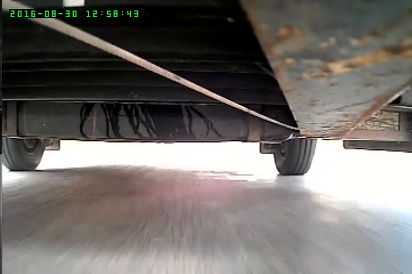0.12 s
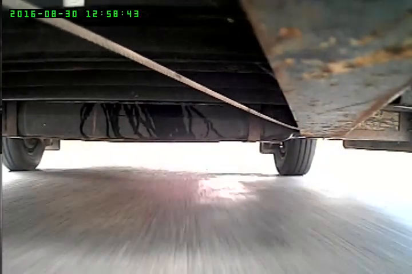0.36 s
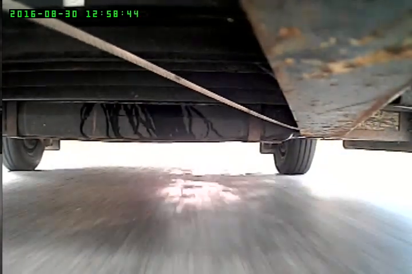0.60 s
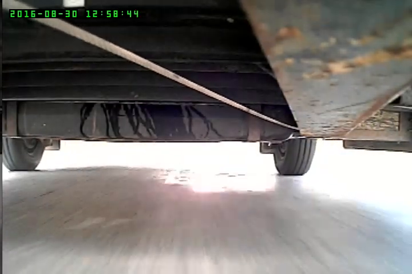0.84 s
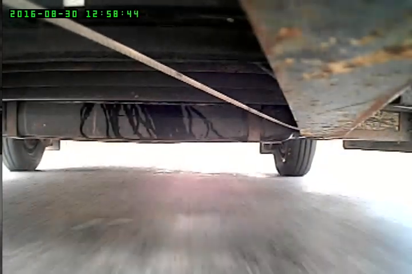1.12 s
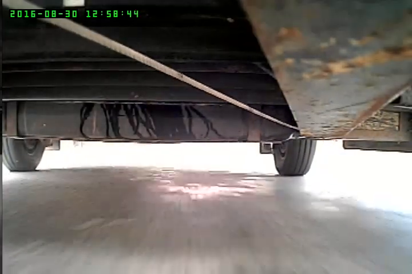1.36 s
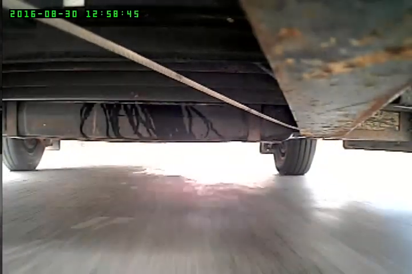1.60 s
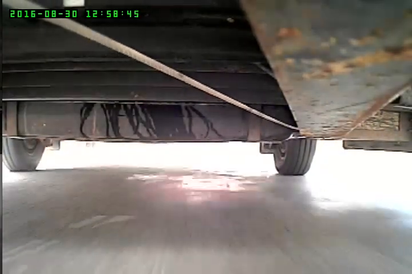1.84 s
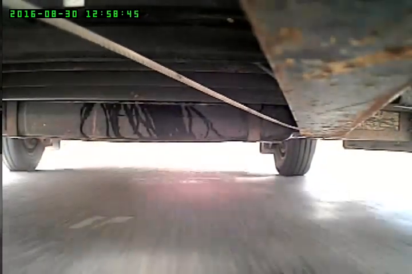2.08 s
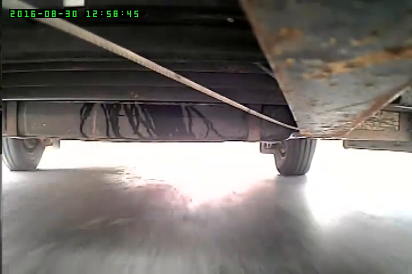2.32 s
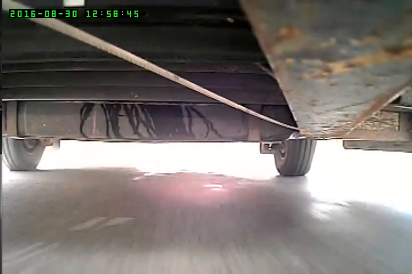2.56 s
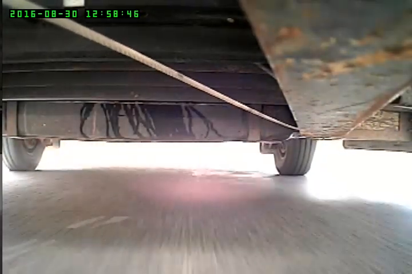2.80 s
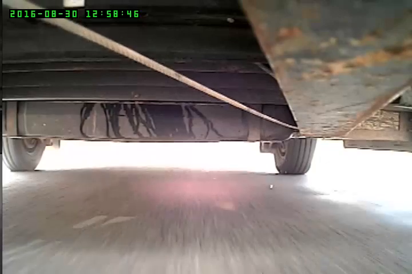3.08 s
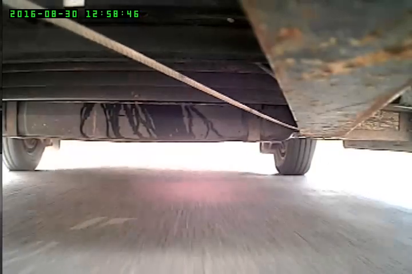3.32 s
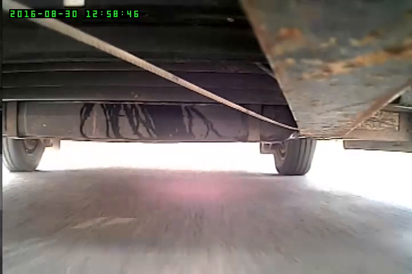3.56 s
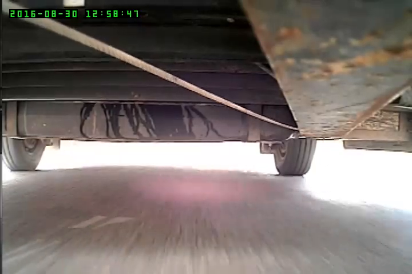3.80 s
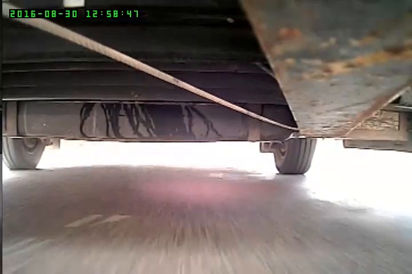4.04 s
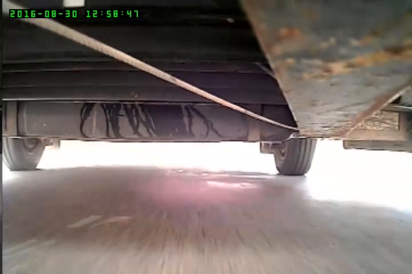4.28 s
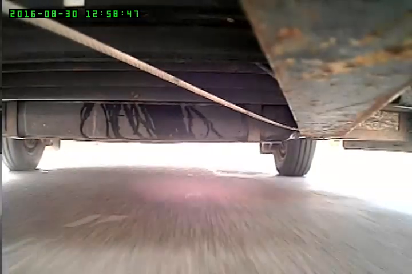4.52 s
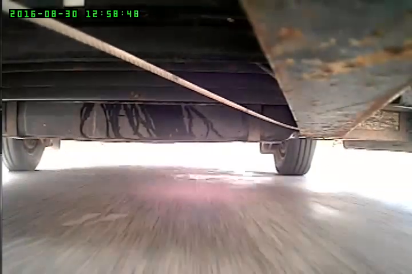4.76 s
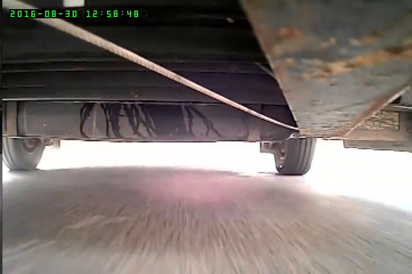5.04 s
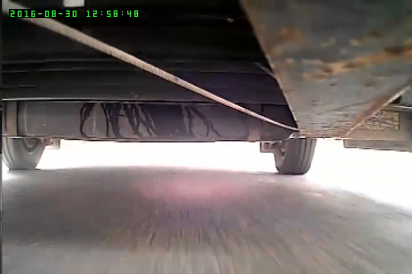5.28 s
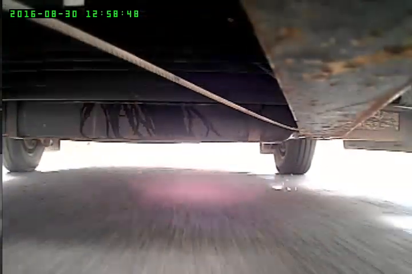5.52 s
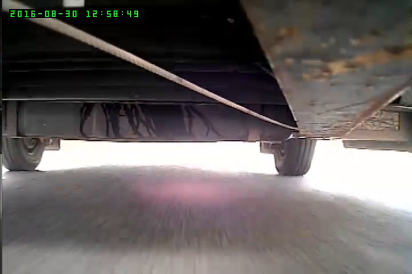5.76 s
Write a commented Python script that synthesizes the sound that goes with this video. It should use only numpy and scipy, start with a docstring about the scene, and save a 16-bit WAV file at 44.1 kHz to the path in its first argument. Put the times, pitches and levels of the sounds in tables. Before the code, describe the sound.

A microphone fixed beneath a caravan towed at speed takes in nearly six seconds of unbroken road noise. Deep, irregular bass buffeting dominates, fluttering and thudding several times a second, with its strongest surges clipping into rough distortion. Over it runs a steady low tyre drone and grainy roar from coarse tarmac, with a thin fizz of air from the tread. A faint high squeak slides down at the very start; grit puffs at 0 and 0.5 s, with two close stone ticks near 0.45 s and a slight hiss swelling around 0.7 s. The tow car's low engine hum rises to about 1.8 s, sinks by 2.7 s, and later wavers, its pitch creeping up very slightly. Soft tread scrubs come near 4, 4.7 and 5.1 s, the roar lifts briefly around 4.6 and 5.5 s, and faint stone ticks fall near 3.5, 4.7 and 5.85 s. It ends still rolling.

```python
"""Under a caravan towed at speed over a coarse sealed road, heard through one overloading microphone.
Shaped noise and tone bursts make the deep bass throb of air and chassis; noise bands make the tyre roar.
The tow car's eight-cylinder engine is a sum of crankshaft multiples that slowly gains speed.
Grit hisses in bands of noise, a squeal slides down, and stones ring the floor pan as damped tones."""
import sys
import numpy as np
from scipy import signal
from scipy.fft import rfft, irfft, next_fast_len
from scipy.io import wavfile
from scipy.ndimage import uniform_filter1d, map_coordinates

SR = 44100
rng = np.random.default_rng(int(sys.argv[2]) if len(sys.argv) > 2 else 0)


def generate_wav(sig):
    """Save sig (samples, or channels by samples) to the path in sys.argv[1] as 16-bit PCM at SR."""
    pcm = np.round(np.clip(np.atleast_2d(sig).T, -1, 1) * 32767).astype(np.int16)
    wavfile.write(sys.argv[1], SR, pcm)


def invert_db(x):
    """Field ratio 10**(x/20) for x, a level in decibels (scalar or array-like)."""
    u = np.asarray(x, float) / 20
    return 10 ** u


N = 259274  # samples
TIME = np.arange(N) / SR  # s


def unit(x):
    """Normalisation: scales a signal to an rms of 1."""
    return x / np.sqrt(np.mean(x ** 2) + 1e-20)


def curve(rows):
    """Linear interpolation: joins (t/s, level/dB) points into one level per sample."""
    s, db = np.transpose(rows)
    return np.interp(TIME, s, db)


def wobble(rate):
    """Band-limited fluctuation: a spline through random knots, rate of them a second."""
    knots = rng.standard_normal(int(N * rate / SR) + 4)
    return map_coordinates(knots, [np.arange(N) * rate / SR])


def coloured(x, spectrum):
    """Linear filtering: x through (f/Hz, level/dB) points joined on a log axis, -120 dB outside."""
    m = next_fast_len(N + 8192)
    hz, db = np.transpose(spectrum)
    log_f = np.log(np.fft.rfftfreq(m, 1 / SR) + 1)
    shape = np.interp(log_f, np.log(hz + 1), db, -120, -120)
    return irfft(rfft(x, m) * invert_db(shape), m)[:N]


def rush(spectrum, grain_db, even_s):
    """Modulated noise: grainy from chipping to chipping, level held even over even_s, rms 1."""
    grainy = rng.standard_normal(N) * invert_db(grain_db * wobble(300))
    x = coloured(grainy, spectrum)
    span = int(even_s * SR)
    power = uniform_filter1d(uniform_filter1d(x ** 2, span), span)
    return unit(x / np.sqrt(np.abs(power) + 1e-12))


def swell(s, half_s):
    """Gaussian envelope: a smooth hump of height 1 around s, down to 1/e at half_s."""
    return np.exp(-((TIME - s) / half_s) ** 2)


def burst(s, db, hz, half_s, phase):
    """Wave packet: a tone under a Gaussian envelope, phase in cycles."""
    return invert_db(db) * swell(s, half_s) * np.sin(2 * np.pi * (hz * TIME + phase))


# spectrum of the air pumping under the floor: f/Hz, relative level/dB per Hz
SWAY_SPECTRUM = [(2, -25), (5, -3.5), (12, -1), (16, 4.5), (19, -16), (26, -11), (30, -36)]


def sway():
    """Unsteady pressure: air pumps under the floor as deep, fluctuating noise."""
    return invert_db(-18 + 2.7 * wobble(4.037)) * rush(SWAY_SPECTRUM, grain_db=-1.5, even_s=0.27)


# spectrum of the chassis on its springs: f/Hz, relative level/dB per Hz
BOUNCE_SPECTRUM = [(22, -43.5), (27, -9), (32, -3.5), (35, -5), (39, -5), (44, -5.5), (50, -42)]


def bounce():
    """Mass on a spring: the bouncing chassis favours a narrow band of noise."""
    return invert_db(-21 + 1.1 * wobble(14)) * rush(BOUNCE_SPECTRUM, grain_db=2.5, even_s=0.16)


# spectrum of the throbbing floor pan: f/Hz, relative level/dB per Hz
THROB_SPECTRUM = [(40, -47), (46, 0.5), (55, 1), (62, -7), (69, -17), (80, -20.5), (95, -47)]


def throb():
    """Panel resonance: the floor pan throbs in a narrow bass band."""
    return invert_db(-21 + 1.95 * wobble(13)) * rush(THROB_SPECTRUM, grain_db=-1.0, even_s=0.12)


# coarseness of the surface, as tread roar: t/s, level/dB
ROAD_LEVEL = [(0, -31.5), (.7, -32), (1.1, -31.5), (1.8, -32), (2.6, -31.5), (3.3, -31.5), (4, -30.5),
              (4.5, -31), (4.95, -31), (5.4, -31), (5.88, -31)]
# patches of road that change the roar, mostly lifting it: t/s, level change/dB, half length/s
ROAD_PATCHES = [(1.073, 1, 0.073), (2.815, -0.5, 0.023), (4.577, 2, .03), (4.883, 1, 0.04),
                (5.106, 1, 0.055), (5.494, 1.5, 0.026)]


def road():
    """Roughness excitation: the surface sets the tread level/dB and its brief changes/dB."""
    patch_db = sum(db * swell(s, half_s) for s, db, half_s in ROAD_PATCHES)
    return curve(ROAD_LEVEL), patch_db


# spectrum of the tyre carcass: f/Hz, relative level/dB per Hz
DRONE_SPECTRUM = [(55, -22.5), (66, -2), (100, -1), (135, -1), (155, 0), (177, -7), (189, 0), (199, -5.5),
                  (210, -4), (228, -4.5), (280, -12), (320, -6.5), (420, -13.5), (520, -31), (650, -53)]


def drone(road_db):
    """Carcass vibration: low noise follows the road's swings, above the tread roar."""
    level_db = road_db + 7.5 + 0.78 * wobble(15)
    return invert_db(level_db) * rush(DRONE_SPECTRUM, grain_db=0.45, even_s=0.084)


# spectrum of the tread on the chippings: f/Hz, relative level/dB per Hz
ROAR_SPECTRUM = [(330, -33.5), (420, 1), (500, 1.5), (620, -3), (750, -1), (860, -5.5), (940, -4.5),
                 (1100, -8), (1400, -12.5), (1700, -27.5), (2100, -46.5)]


def roar(road_db, patch_db):
    """Impact noise: tread on chippings gives a broad band at the road's level."""
    level_db = road_db + patch_db + .4 * wobble(13)
    return invert_db(level_db) * rush(ROAR_SPECTRUM, grain_db=1.24, even_s=1.0)


# spectrum of air leaving the tread grooves: f/Hz, relative level/dB per Hz
FIZZ_SPECTRUM = [(1150, -48.5), (1450, -0.5), (1600, 0.5), (2000, -2), (2450, -2.5), (2950, -7.5),
                 (3250, -11), (3600, -14.5), (4000, -20), (4600, -30.5), (5500, -51.5)]


def fizz(road_db, patch_db):
    """Air pumping: air squeezed from the grooves fizzes, feeling the patches less than the roar."""
    level_db = road_db + 0.68 * patch_db - 14.5 + 0.59 * wobble(21)
    return invert_db(level_db) * rush(FIZZ_SPECTRUM, grain_db=1.0, even_s=0.19)


# spectrum of grit lifted off the road: f/Hz, relative level/dB per Hz
GRIT_SPECTRUM = [(3000, -35), (4000, -9), (5000, -6), (5600, -4), (6100, 1), (6700, -6), (8000, -7),
                 (9500, -8), (10300, -12), (11200, -25), (12000, -29)]
# times when the grit hiss swells: t/s, rise/dB, half length/s
GRIT_RISES = [(0.67, 3.5, 0.055), (0.77, 5.5, 0.085), (0.99, 2, 0.1)]


def grit():
    """Random impacts: many grains blend into a hiss with a few swells."""
    rise_db = sum(db * swell(s, half_s) for s, db, half_s in GRIT_RISES)
    level_db = -57.5 + rise_db + 0.71 * wobble(15)
    return invert_db(level_db) * rush(GRIT_SPECTRUM, grain_db=1.2, even_s=0.18)


# spectrum of a puff of grit: f/Hz, relative level/dB per Hz
PUFF_SPECTRUM = [(1200, -26.5), (1800, 6), (2600, 8.5), (3500, -4), (4600, -2.5), (5400, 0), (6100, 3),
                 (6900, -7), (9000, -9), (10500, -11.5), (12000, -34)]
# puffs of loose grit thrown up: t/s, peak level/dB, half length/s
PUFF_TIMES = [(0, -49, 0.06), (0.48, -47, 0.065), (2.95, -57, 0.056), (3.966, -53.5, .07),
              (4.744, -55, .07), (5.069, -55, 0.062)]


def puffs():
    """Gated noise: loose grit thrown up hisses under short Gaussian envelopes."""
    envelope = sum(invert_db(db) * swell(s, half_s) for s, db, half_s in PUFF_TIMES)
    return envelope * rush(PUFF_SPECTRUM, grain_db=0.0, even_s=.1)


# exhaust tones: multiple of crank speed, level before effort/dB rms
EXHAUST_ORDERS = [(2, -29.5), (3, -41), (4, -26.5), (5, -45), (5.5, -47.5), (6, -48), (8, -40.5),
                  (8.5, -44), (9.5, -44.5), (10.5, -45), (11.5, -56.5), (13.5, -46), (16, -64.5),
                  (17, -52.5), (19, -60.5), (24, -66.5), (28, -64.5)]
# engine effort: t/s, level change/dB
ENGINE_EFFORT = [(0, 1), (.5, 2), (.8, 0), (1.3, 3), (1.8, 4.5), (2.35, 2.5), (2.65, -3), (3.3, 0),
                 (3.8, -3), (4.2, -4), (4.6, -2), (5.1, 0), (5.6, -2.5), (5.88, -4)]


def engine():
    """Harmonic series: four firings a turn; uneven cylinders add the half multiples."""
    waver = 0.33 + 0.14 * np.clip(TIME - 2.3, 0, 2)  # turns/s, growing from 2.3 s to 4.3 s
    turns_per_s = 29.83 + 0.2 * TIME + waver * wobble(11)  # crank speed and its steady gain
    angle = 2 * np.pi * np.cumsum(turns_per_s) / SR
    start = 2 * np.pi * rng.random(len(EXHAUST_ORDERS))
    tones = sum(invert_db(db) * np.sin(order * angle + p) for (order, db), p in zip(EXHAUST_ORDERS, start))
    level_db = curve(ENGINE_EFFORT) + 0.64 * wobble(5.1) + 1.2 * wobble(16)
    return np.sqrt(2) * invert_db(level_db) * tones  # sqrt(2) turns rms into peak


def squeak():
    """Frequency modulation: a short squeal slides down and settles, breathy from random scatter."""
    from_hz, to_hz, fall_s, scatter_hz = 4600, 3700, 0.022, 130
    hz = to_hz + (from_hz - to_hz) * np.exp(-TIME / fall_s) + scatter_hz * wobble(900)
    envelope = invert_db(-52) * swell(0.035, 0.045) * (1 + .5 * wobble(500))
    return envelope * np.sin(2 * np.pi * np.cumsum(hz) / SR)


# strongest surges of the deep bass: t/s, peak level before the floor stiffens/dB, f/Hz
BASS_SURGES = [(0.113, -8.5, 50.6), (0.156, -11.5, 33.7), (0.188, -14, 22.4), (0.218, -8.5, 53.3),
               (0.277, -9.5, 35.6), (0.32, -14, 57), (0.374, -15, 33.7), (0.431, -11, 16.2),
               (0.644, -7, 44), (0.762, -6.5, 36), (0.785, -10.5, 52), (0.932, -8, 37), (1.018, -8.5, 48.1),
               (1.15, -14.5, 62), (1.209, -9.5, 37.3), (1.268, -11, 16.5), (1.435, -10.5, 15.3),
               (1.46, -7.5, 45.7), (1.63, -13.5, 18.8), (1.721, -9.5, 39.2), (1.794, -11, 59),
               (1.864, -8, 41.6), (2.156, -8.5, 34.6), (2.408, -9.5, 34.5), (2.447, -11, 13.5),
               (2.537, -8.5, 37), (2.683, -12, 37.3), (2.925, -11, 15.8), (2.941, -10.5, 47),
               (3.159, -8.5, 47), (3.46, -9, 16.5), (3.463, -9.5, 54), (3.639, -9, 15.2),
               (3.834, -10.5, 20.3), (3.848, -8, 37.3), (3.87, -13, 61), (3.971, -8, 37),
               (4.256, -11, 56.0), (4.32, -6.5, 37.4), (4.401, -9, 37.3), (4.503, -12.5, 32.0),
               (4.571, -11, 19.3), (4.726, -8.5, 35.4), (4.803, -10, 37.3), (4.882, -6.5, 18.1),
               (5.029, -8, 51), (5.134, -7.5, 54), (5.254, -11, 53.3), (5.551, -5, 46.6),
               (5.553, -11, 17.8), (5.617, -12, 33.7), (5.66, -11, 53), (5.687, -11.5, 17.4),
               (5.842, -6.5, 48.1)]


def surges():
    """Wave packets: chance surges of the random bass, drawn as short tone bursts."""
    half_cycles = 1.76  # half length of a surge, in cycles of its pitch
    phases = rng.random(len(BASS_SURGES))
    return sum(burst(s, db, hz, half_cycles / hz, p) for (s, db, hz), p in zip(BASS_SURGES, phases))


def stiffened(bass):
    """Nonlinear stiffness: the floor's swing saturates smoothly towards its largest travel."""
    travel = 1.3
    return travel * np.tanh(bass / travel)


# stones thrown against the floor pan: t/s, level before the common gain/dB, f/Hz of the ring
STONE_HITS = [(0.4528, -32, 2340), (0.4595, -33, 2340), (3.46, -43, 5600), (4.7246, -40, 2130),
              (5.856, -37, 6200)]


def stones():
    """Damped free vibration: each stone rings a panel for a few ms, with a sharp crack on top."""
    out, t = np.zeros(N + SR), np.arange(SR // 20) / SR
    cracks = rng.standard_normal((len(STONE_HITS), len(t)))
    for (s, db, hz), noise in zip(STONE_HITS, cracks):
        decay = invert_db(-60 * t * hz / 20)  # 60 dB lost in 20 cycles
        ring = np.sin(2 * np.pi * hz * t) * decay * (1 - np.exp(-t / 0.00076))
        crack = np.diff(noise, prepend=0) * invert_db(-60 * t / .008)  # 60 dB lost in 8 ms
        out[round(s * SR):][:len(t)] += invert_db(db) * (3.5 * ring + invert_db(-19.5) * crack)
    return out[:N]


# brief tones in the tyre noise, the three highest ringing within the scrub near 3.96 s:
# t/s, peak level/dB, f/Hz
TONE_BURSTS = [(2.821, -23, 415), (3.007, -25, 243.4), (3.925, -45, 1940), (3.957, -45, 1910),
               (4.003, -42, 1740), (4.37, -27, 194.6), (4.548, -20, 167.4), (4.563, -29, 453),
               (5.489, -23, 215)]


def tone_bursts():
    """Wave packets: random moments when one pitch pokes out of the tyre noise."""
    phases = rng.random(len(TONE_BURSTS))
    return sum(burst(s, db, hz, 0.024, p) for (s, db, hz), p in zip(TONE_BURSTS, phases))


# spectrum of scrubbing tread: f/Hz, relative level/dB per Hz
SCRUB_SPECTRUM = [(1300, -30), (1650, 1), (1950, -0.5), (2500, -2.5), (2900, -5.5), (3400, -26)]
# scrubs over rough spots: t/s, peak level/dB, half length/s
SCRUB_TIMES = [(3.958, -45.5, .075), (4.74, -49, .05), (5.06, -49, .05)]


def scrubs():
    """Sliding friction: the tread scrubs over rough spots in short rushes of noise."""
    envelope = sum(invert_db(db) * swell(s, half_s) for s, db, half_s in SCRUB_TIMES)
    return envelope * rush(SCRUB_SPECTRUM, grain_db=1.0, even_s=.03)


def scene():
    """Superposition: all sources add at one microphone."""
    road_db, patch_db = road()
    buffet = stiffened(sway() + bounce() + throb() + surges())
    tyres = drone(road_db) + roar(road_db, patch_db) + fizz(road_db, patch_db) + scrubs() + tone_bursts()
    loose_grit = grit() + puffs()
    return (buffet + tyres + loose_grit + engine() + squeak() + stones())[None]


def roll_off(x):
    """The treble ends steeply here."""
    return signal.sosfilt(signal.butter(12, 12200, fs=SR, output="sos"), x)


def record(dry):
    """Hard clipping: the microphone sits slightly off zero and overloads on the largest throbs."""
    offset, top = .021, .7075  # of full scale
    mix = np.clip(dry - offset, -top, top)
    return roll_off(mix)


dry = scene()
out = record(dry)
generate_wav(out)
```